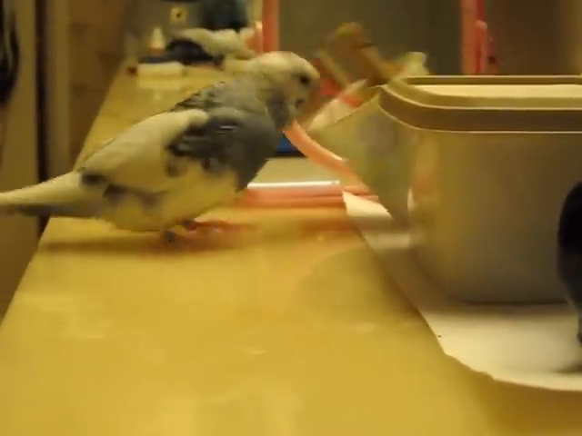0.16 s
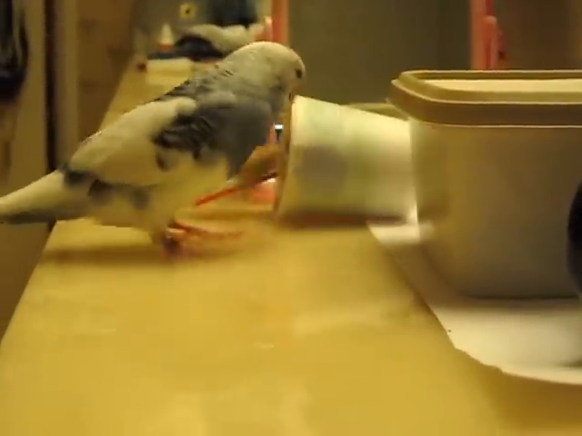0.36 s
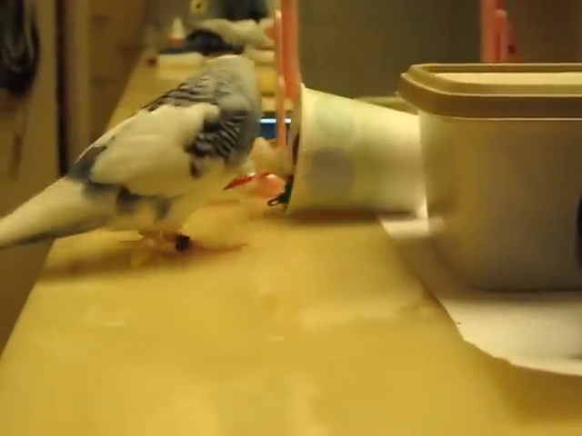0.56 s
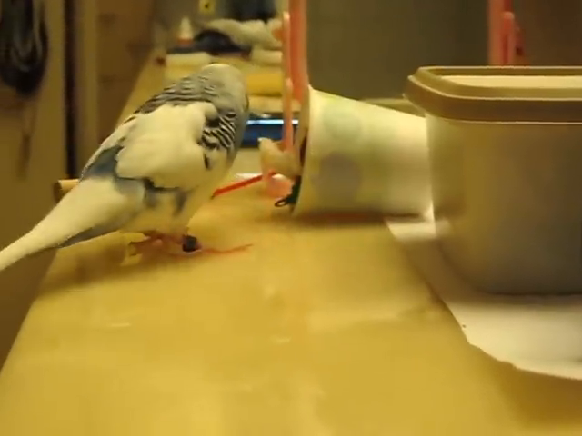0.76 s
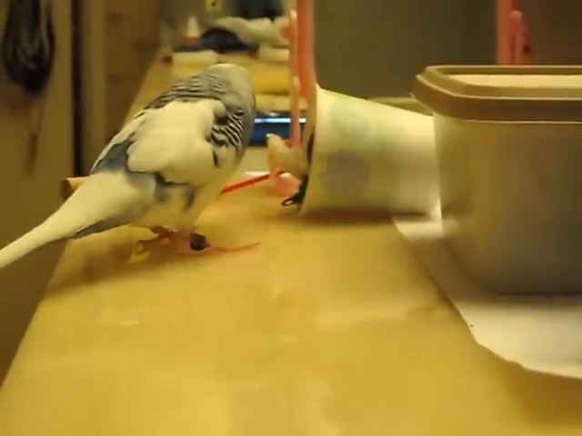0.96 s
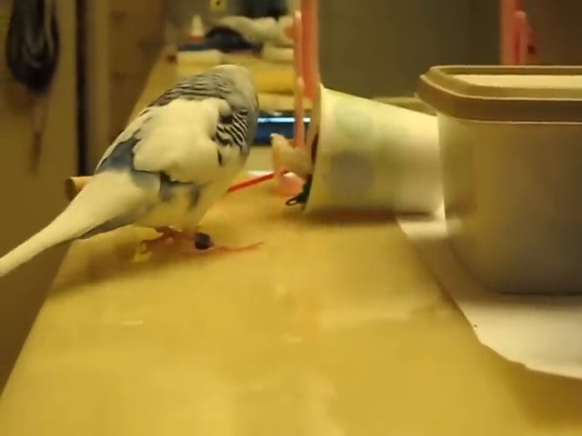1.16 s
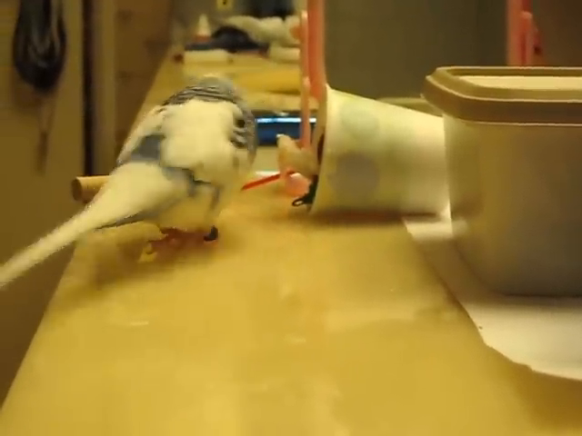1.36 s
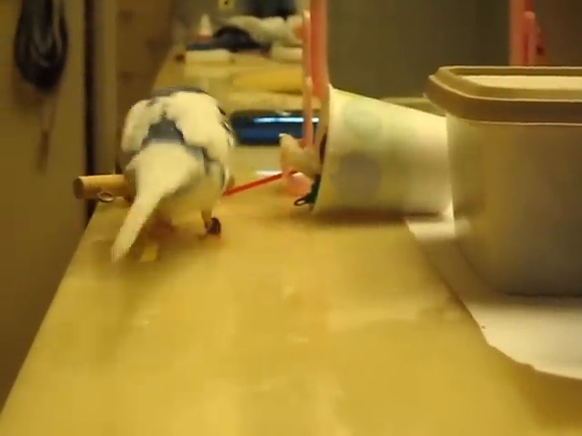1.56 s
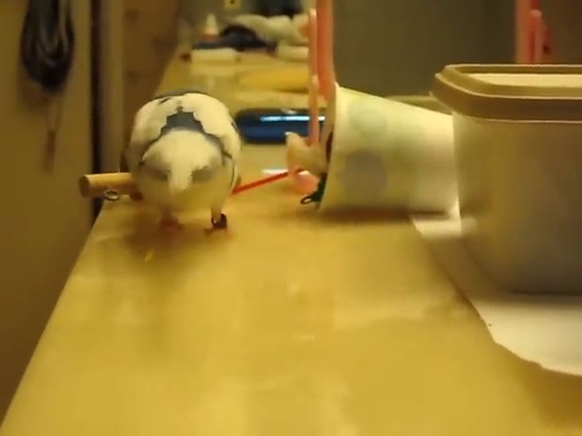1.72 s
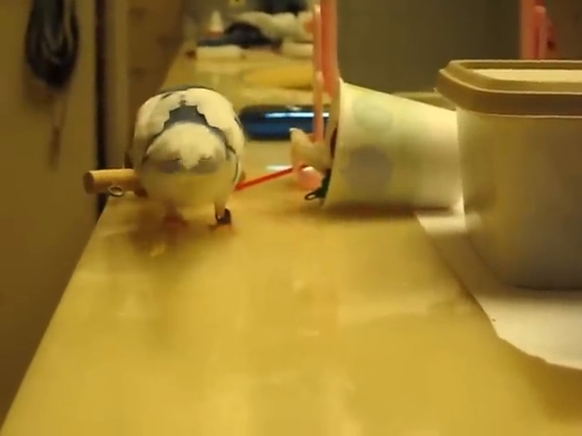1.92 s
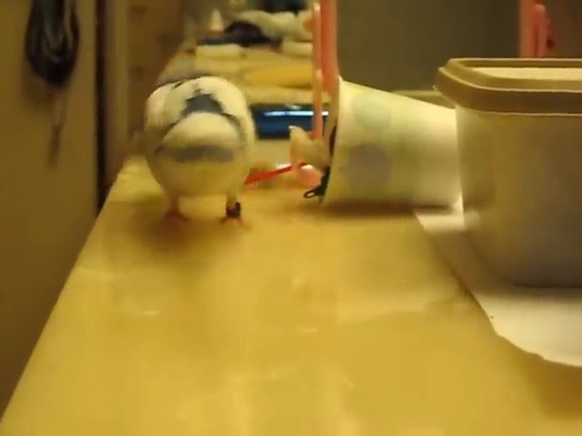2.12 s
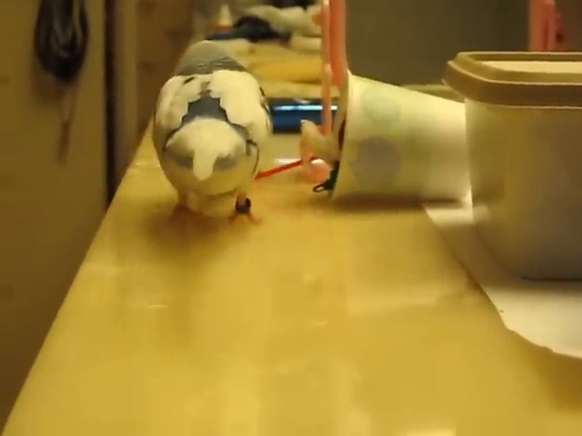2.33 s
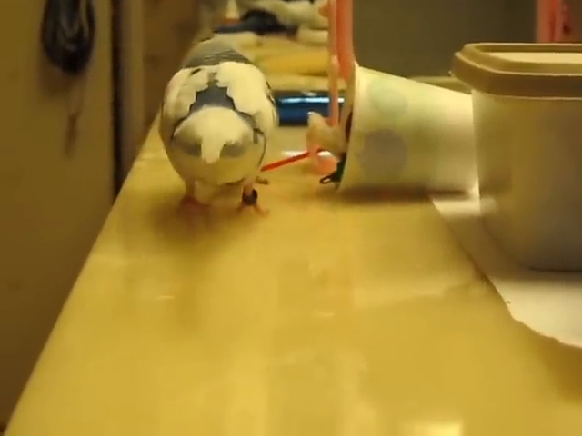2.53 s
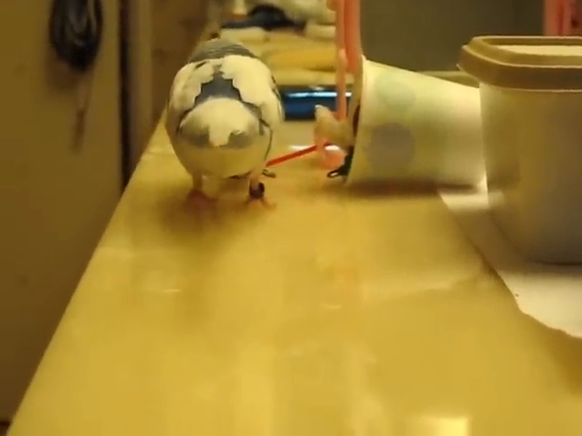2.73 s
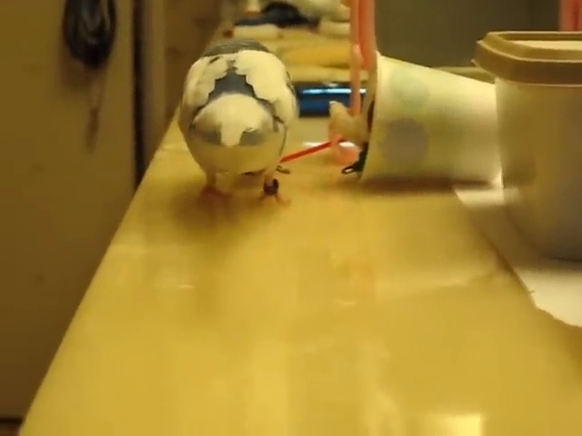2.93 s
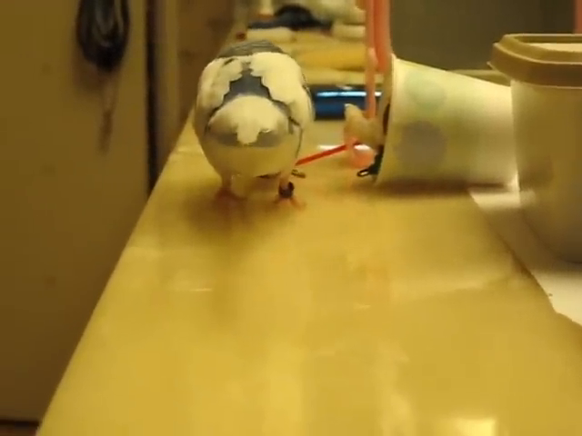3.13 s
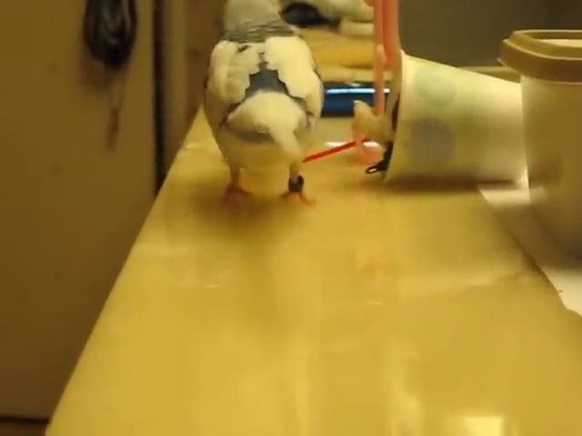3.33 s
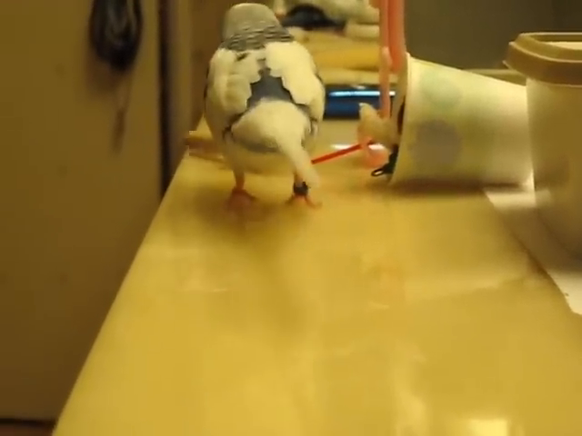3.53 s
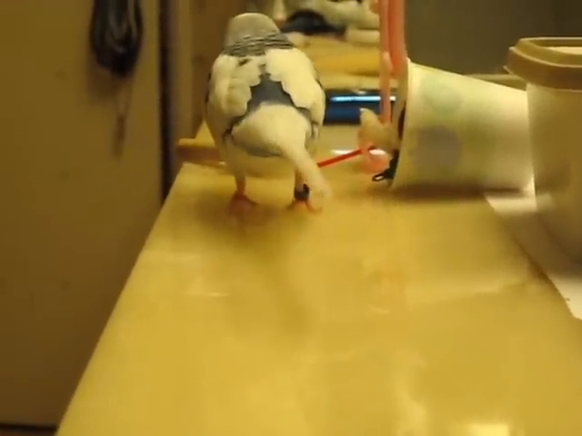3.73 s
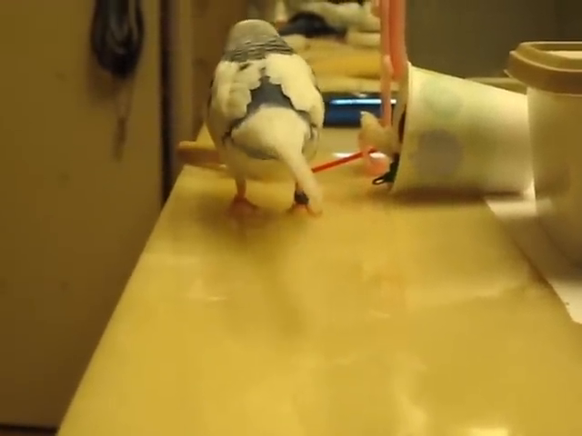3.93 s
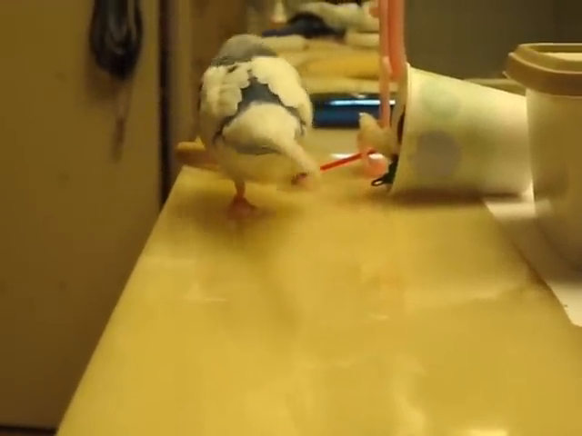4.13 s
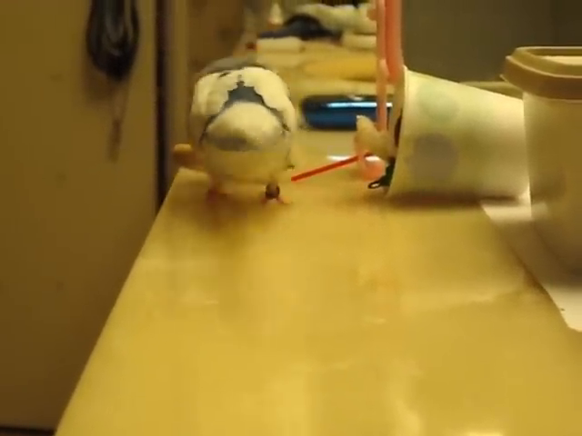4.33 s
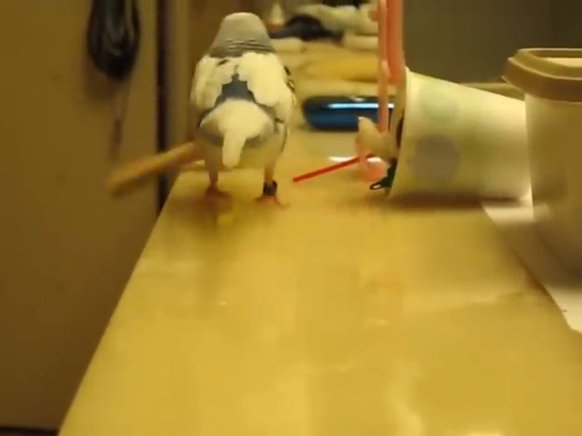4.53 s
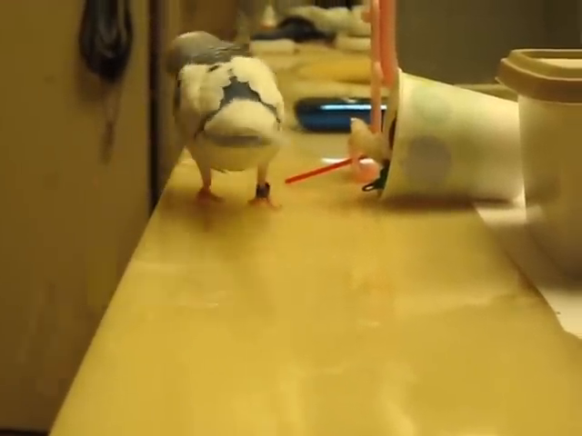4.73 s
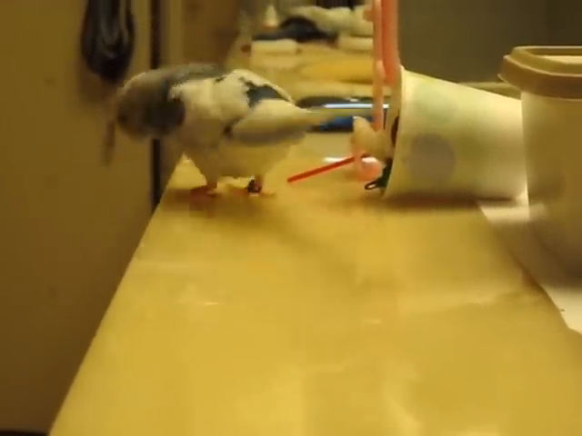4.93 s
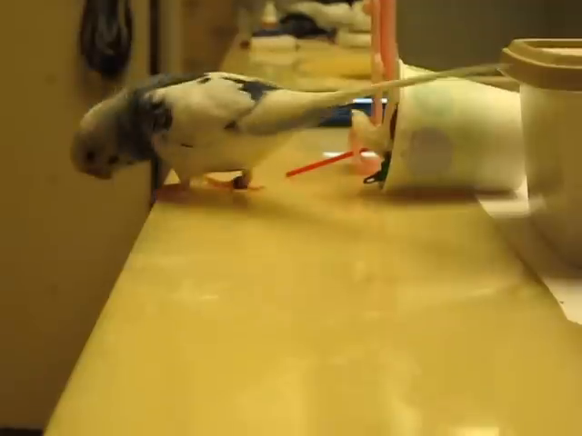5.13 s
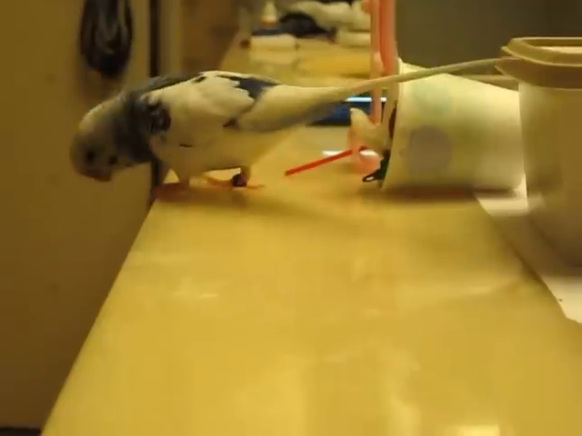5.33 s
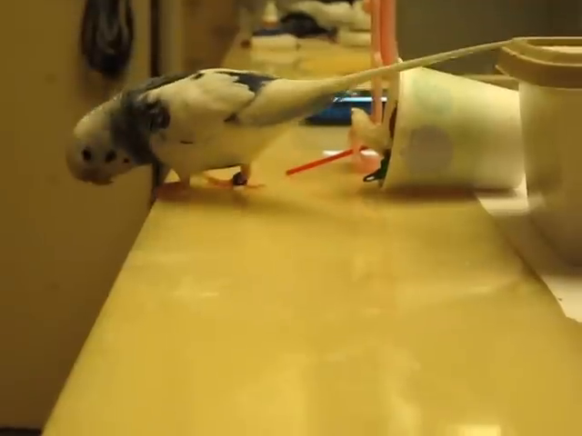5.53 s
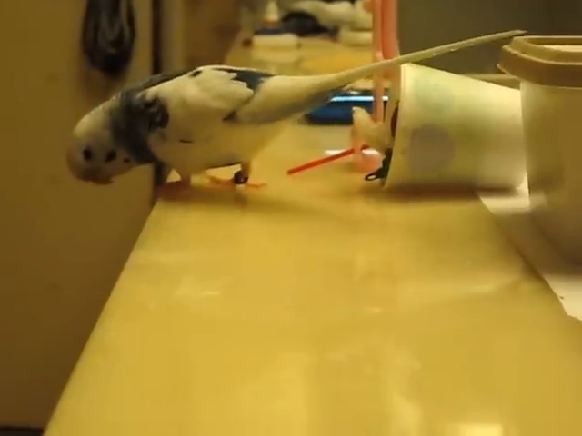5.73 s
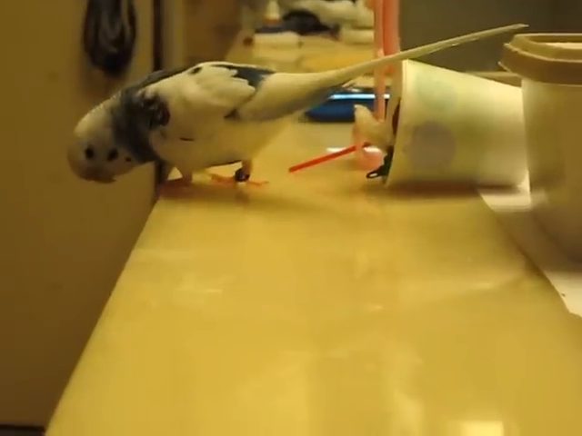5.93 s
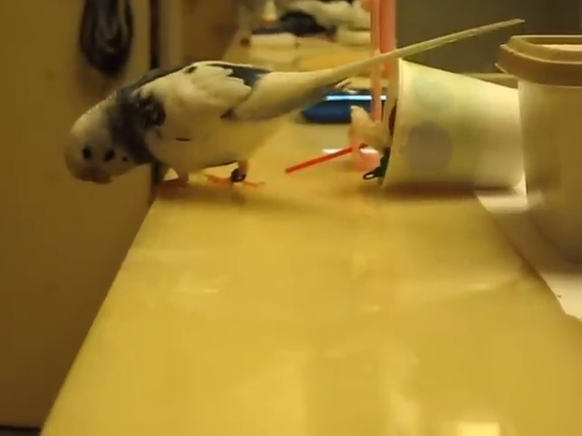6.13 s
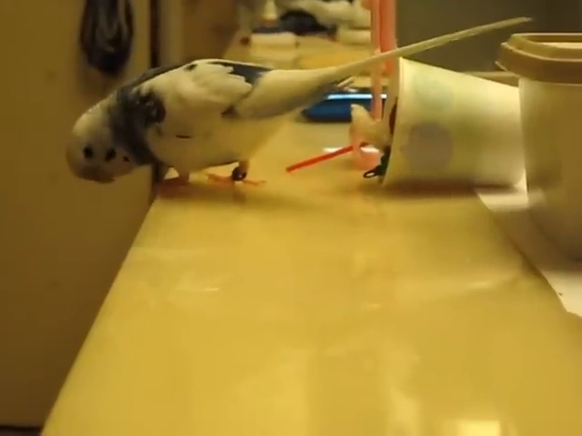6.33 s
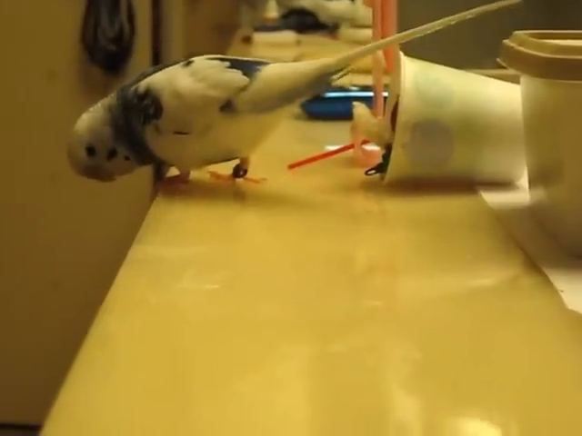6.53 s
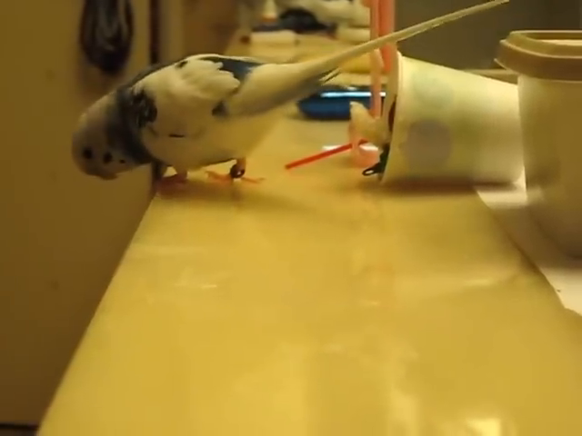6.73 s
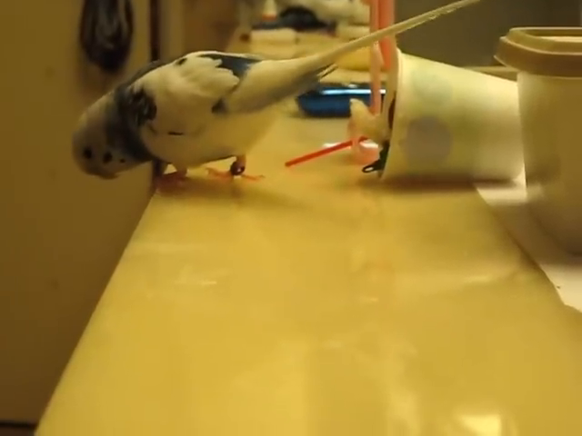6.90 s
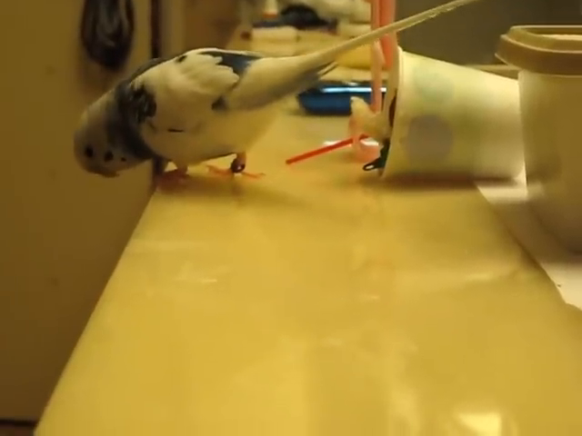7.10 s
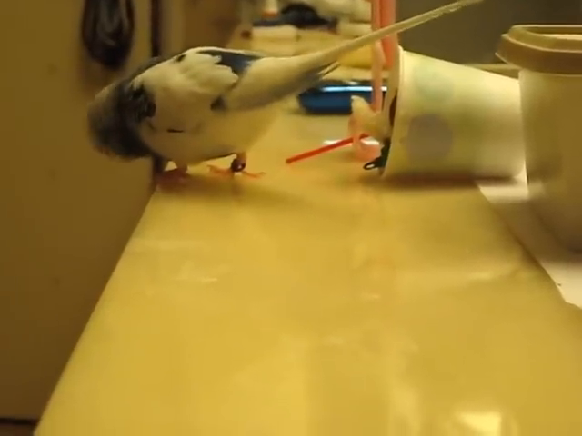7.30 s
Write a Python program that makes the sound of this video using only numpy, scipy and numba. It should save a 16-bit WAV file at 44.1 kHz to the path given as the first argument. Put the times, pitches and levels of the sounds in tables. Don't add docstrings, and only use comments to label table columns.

```python
import sys
import numpy as np
from scipy import signal
from scipy.fft import rfft, irfft
from scipy.io import wavfile
from scipy.ndimage import uniform_filter1d
from numba import njit

SR = 44100
rng = np.random.default_rng(int(sys.argv[2]) if len(sys.argv) > 2 else 0)


def to_wav(s):
    ch = np.atleast_2d(s).T
    pcm = np.round(np.clip(ch, -1, 1) * 32767)
    wavfile.write(sys.argv[1], SR, pcm.astype(np.int16))


def to_linear_factor(level_db):
    exponent = np.asarray(level_db, float) / 20
    return 10 ** exponent


N = 328986
T = np.arange(N) / SR


def unit(x):
    return x / np.sqrt(np.mean(x ** 2))


def peak1(x):
    return x / abs(x).max()


def band(x, lo_hz, hi_hz, order=2):
    edges_hz = [lo_hz, min(hi_hz, 0.45 * SR)]
    return signal.sosfilt(signal.butter(order, edges_hz, "bandpass", fs=SR, output="sos"), x)


def coloured(x, points):
    hz, db = np.transpose(points)
    f = np.fft.rfftfreq(len(x), 1 / SR) + 1
    gain = to_linear_factor(np.interp(np.log(f), np.log(hz), db))
    return unit(irfft(rfft(x) * gain, len(x)))


def walk(rate):
    k = int(SR / rate)
    held = np.repeat(rng.standard_normal(N // k + 1), k)[:N]
    return unit(uniform_filter1d(held, k))


def curve(table, column):
    rows = np.array(table)
    return np.interp(T, rows[:, 0], rows[:, column], left=-150, right=-150)


def add(out, s, sound):
    i = int(s * SR)
    out[i:i + len(sound)] += sound[:N - i]


def ring(hz, db, t60_s, length_s, rise_s):
    t = np.arange(int(length_s * SR)) / SR
    hz, db, t60_s = (np.asarray(v)[:, None] for v in (hz, db, t60_s))
    decay = to_linear_factor(db) * 1000 ** (-t / t60_s)
    return decay * np.sin(2 * np.pi * hz * t) * (1 - np.exp(-t / rise_s)) ** 2


def resonate(x, peaks):
    return unit(sum(to_linear_factor(db) * band(x, hz - width, hz + width, order=1) for hz, width, db in peaks))


@njit
def hollow(x, hz, k):
    y, b, l = np.empty(len(x)), 0., 0.
    for i in range(len(x)):
        g = np.tan(np.pi * hz[i] / SR)
        v = (b + g * (x[i] - l)) / (1 + g * (g + k))
        b, l, y[i] = 2 * v - b, l + 2 * g * v, k * v
    return y


def grains(rate, scatter_db):
    happens = rng.random(N) < rate / SR
    strength_db = scatter_db * np.minimum(rng.exponential(size=N), 3.5)
    return unit(happens * rng.standard_normal(N) * to_linear_factor(strength_db))


def body(x):
    # (pitch_hz, width_hz, level_db)
    hollows = [(490, 70, 19.5), (830, 16, 16), (1230, 90, 8.5), (1354, 15, 0.5), (1750, 22, 8.5),
               (2150, 71, -2), (2620, 8.4, 12.5), (2905, 46, 9.5)]
    return sum(to_linear_factor(db) * band(x, hz - 1.3 * width, hz + 1.55 * width, order=1) for hz, width, db in hollows)


def background():
    # (pitch_hz, level_db per Hz)
    air = [(12, -50), (20, -11.5), (60, -9.5), (210, -8), (241, -6.5), (270, -9.5), (357, -8), (388, -9),
           (1530, -13), (5230, -19), (7950, -20), (9950, -23.5), (16000, -29)]
    # (pitch_hz, level_db rms)
    hum_lines = [(120, -81.5), (241, -67.5), (361, -71.5), (600, -91), (722, -80.5)]
    hum = np.zeros(N)
    for hz, db in hum_lines:
        level = to_linear_factor(db + 0.52 * walk(15)) * np.sqrt(2)
        hum += level * np.sin(2 * np.pi * np.cumsum(hz + 2.405 * walk(11)) / SR)
    hiss_db = -57 - 0.67 + 0.88 * walk(3.08)
    return coloured(rng.standard_normal(N), air) * to_linear_factor(hiss_db) + hum


def rattle():
    # (start_s, level_db, fade_db per s, hollow_hz, scratchy top_db against the level)
    bursts = [(0.013, -44, 400, 1600, -11), (0.08, -55.5, 47, 1190, -17.5), (0.406, -38, 68, 1490, -6.5),
              (0.465, -34, 108, 1260, -20), (0.592, -42.5, 123, 1890, -33), (0.681, -38.5, 146, 2150, -30),
              (0.746, -48, 117, 2100, -20), (0.85, -49.5, 80, 1400, -22), (2.216, -50, 54, 1280, -18),
              (2.246, -41.5, 102, 800, -21), (2.285, -40, 122, 800, -19), (3.433, -32, 127, 1400, -26),
              (3.535, -35.5, 70, 1540, -30), (3.62, -60, 56, 1520, -26), (3.667, -36, 117, 1800, -18.5),
              (3.76, -60, 300, 2050, -28), (4.4245, -51, 200, 1500, -30), (4.572, -26, 127, 1640, -42),
              (4.625, -39.5, 112, 1300, -30), (4.72, -69, 63, 1440, -32), (4.785, -58, 24, 1460, -31),
              (5.18, -48.5, 20, 1600, -30), (5.31, -54, 202, 2000, -3), (6.591, -50.5, 250, 2300, -35),
              (6.979, -80, 205, 2300, 11)]
    # (pitch_hz, width_hz, level_db)
    cup_wall = [(1120, 260, 18), (1920, 110, -10), (2150, 62, -10), (2440, 15, -8), (2570, 18, -13),
                (2850, 74, -1)]
    # (pitch_hz, width_hz, level_db)
    peg_wood = [(814, 35, 1.5), (1210, 28, 5.5), (1373, 11, 0.5), (1750, 45, 5.5), (1520, 20, 0),
                (2135, 36, 4.5), (2600, 22, 5.5), (870, 36, 1.5), (2940, 20, -4)]
    rise_s, lasts_s, upper_middle_db = 0.0026, 0.37, 10

    hits = grains(7000, 1.2)
    rows = np.array(bursts)
    hollow_hz = np.clip(np.interp(T, rows[:, 0], rows[:, 3]), 300, 5000)
    rolling = unit(hollow(hits, hollow_hz, 1.0))
    wall = np.where(T < 1.5, resonate(hits, cup_wall), resonate(hits, peg_wood))
    low = unit(unit(body(hits)) + 3.4 * rolling + 2.2 * unit(band(hits, 600, 3350, order=3)) + 3.5 * wall)

    fine = grains(7000, 2.0)
    mid = unit(band(fine, 3500, 6900, order=3))
    top = unit(band(fine, 8300, 14400, order=3))

    power, scratch = np.zeros(N), np.zeros(N)
    t = np.arange(int(lasts_s * SR)) / SR
    ramp = np.clip(np.minimum(t / rise_s, (lasts_s - t) / 0.24), 0, 1)
    for s, db, fade, _, top_db in bursts:
        shape = (to_linear_factor(db - abs(fade) * t) * ramp) ** 2
        add(power, s, shape)
        add(scratch, s, shape * to_linear_factor(2 * top_db))
    return band(low, 217, 4900) * np.sqrt(power) + (top + mid * to_linear_factor(upper_middle_db)) * np.sqrt(scratch)


def ticks():
    # (start_s, peak_db)
    contacts = [(0.014, -36), (0.203, -42), (0.236, -44), (0.4037, -18), (0.4708, -22), (0.495, -13.5),
                (0.5301, -17.5), (0.6814, -49), (0.6992, -40), (0.7322, -36), (0.773, -41), (2.251, -40),
                (2.2757, -44), (2.312, -37), (2.327, -35), (2.3604, -36), (3.435, -45), (3.4738, -24.5),
                (3.6204, -29), (4.5708, -32), (5.5994, -48), (6.3702, -43), (6.9756, -38), (6.9788, -46),
                (6.9836, -42)]
    out, t = np.zeros(N), np.arange(SR // 50) / SR
    fade = np.exp(-t / 0.00041) + 0.12 * np.exp(-t / 0.0041)
    clicks = band(rng.standard_normal((len(contacts), len(t))) * fade, 3600, 16300, order=3)
    for (s, peak_db), click in zip(contacts, clicks):
        add(out, s, to_linear_factor(peak_db + 5.5) * peak1(click))
    return out


def knocks():
    # (start_s, peak_db, centre_hz, bright edge_db against the peak)
    cup_knocks = [(0.015, -30.5, 1770, -1), (0.023, -40, 1090, -14), (0.078, -34.5, 943, -12),
                  (0.086, -34.5, 1240, -6), (0.174, -42, 1160, -10), (0.204, -37, 1750, -3),
                  (0.392, -33, 1760, -6), (0.4032, -15.5, 1690, 1), (0.4028, -21, 4800, 7),
                  (0.418, -21.5, 1020, -5), (0.466, -20, 2150, -11), (0.478, -23.5, 2210, -8),
                  (0.492, -26, 2450, 1), (0.563, -37, 900, -20), (0.682, -23, 2370, -24),
                  (0.825, -30.5, 1510, -4), (0.851, -24.5, 2100, -19), (0.889, -37.5, 920, -23),
                  (0.991, -40, 1920, -21), (1.017, -43, 2290, -21), (1.047, -46, 2150, -20),
                  (1.087, -46, 917, -24)]
    peg_knocks = [(2.073, -46, 820, -6), (2.093, -45.5, 2450, -2), (2.251, -29, 850, -7),
                  (2.264, -31.5, 810, -20), (2.286, -28.5, 894, -12), (2.323, -29.5, 877, -13),
                  (3.227, -49, 2290, -15), (3.347, -50, 2270, -15), (3.435, -21.5, 1720, 2),
                  (3.448, -25, 1120, 1), (3.475, -41, 810, -8), (3.539, -32, 900, -10),
                  (3.572, -30, 1100, -9), (3.671, -26.5, 1230, -4), (3.543, -28, 930, -12),
                  (3.594, -27.5, 1700, -20), (3.619, -32.5, 890, -12), (3.894, -39.5, 1086, -31),
                  (3.991, -52, 1230, -3), (4.393, -43.5, 2100, -3), (6.351, -47, 1100, -15),
                  (6.5, -48, 1090, -17), (6.51, -46, 830, -20), (6.583, -35.5, 2400, -24),
                  (6.589, -39.5, 2300, -20)]
    bounces = [(4.5706, -17.5, 1450, -13), (4.5852, -18, 2150, -9), (4.599, -22, 1750, -20),
               (4.624, -19, 1400, -12), (4.652, -26, 1900, -24), (4.6845, -23.5, 1200, -18),
               (4.719, -39, 1600, -22), (4.757, -29.5, 2440, -17), (4.784, -41, 3600, -18),
               (4.788, -30, 2600, -23), (4.81, -27, 1560, -23), (4.916, -28, 2530, -4),
               (5.064, -26, 1560, -10), (5.128, -21, 2400, -12), (5.181, -19.5, 1410, -10),
               (5.195, -23.5, 2150, -3), (5.234, -21, 2450, -15), (5.269, -30, 1910, -18),
               (5.294, -32, 2150, -8), (5.368, -27, 2440, -16), (5.453, -34.5, 1810, -30)]
    hits = cup_knocks + peg_knocks + bounces
    out, jolt = np.zeros(N), np.zeros(N)
    t = np.arange(SR // 50) / SR
    spread = rng.standard_normal((len(hits), 2, 6))
    cracks = rng.standard_normal((len(hits), len(t))) * np.exp(-t / 0.0013)
    edges = band(cracks, 3230, 6800, order=3)
    for (s, peak_db, hz, bright_db), c, crack, edge in zip(hits, spread, cracks, edges):
        step = np.clip(c[0], -0.7, 1.1) * (np.arange(6) > 0)
        t60_s = 0.032 * (1500 / hz) * to_linear_factor(-abs(c[1]))
        rings = ring(hz * to_linear_factor(2.0 * step), -6.5 * abs(step), t60_s, 0.07, 0.00018).sum(axis=0)
        centre = band(crack, 0.77 * hz, 1.53 * hz, order=3)
        add(out, s + 0.00062, to_linear_factor(peak_db - 1.0) * peak1(rings))
        add(out, s + 0.0006, to_linear_factor(peak_db - 10.0) * peak1(centre))
        add(out, s + 0.0006, to_linear_factor(peak_db + bright_db + 3.0) * peak1(edge))
        add(jolt, s, to_linear_factor(peak_db + 3.5) * band(crack, 0.72 * hz, 1.9 * hz))
    light = band(out, 680, 17000, order=3)
    return light + band(body(jolt), 726, 3500)


def snaps():
    # (crest_s, peak_db, pitch_hz, half_length_ms)
    cracklets = [(0.083, -40, 1157, 4.5), (0.4039, -12.5, 3970, 0.62), (0.5935, -20.5, 1760, 0.75),
                 (0.5936, -22, 3300, 0.52), (0.604, -26.5, 2110, 0.83), (0.6828, -16, 2360, 0.33),
                 (0.7459, -17, 2570, 0.38), (0.7553, -33, 2070, 1.1), (0.8262, -30.5, 2250, 0.81),
                 (0.8513, -23, 2170, 1), (0.8835, -38, 2300, 0.7), (0.891, -35, 2000, 0.8),
                 (0.899, -39, 2200, 0.8), (1.0645, -41, 2170, 1.1), (1.086, -48, 2600, 1),
                 (2.2516, -26.5, 2290, 1.15), (2.25, -31, 3580, 0.8), (5.139, -28, 2300, 1.5),
                 (5.196, -22.5, 3600, 1.5), (2.287, -31, 2950, 0.94), (3.7614, -14.5, 2450, 0.29),
                 (3.7653, -18.5, 2500, 0.35), (3.769, -34, 2300, 0.58), (3.771, -31, 1690, 0.76),
                 (3.8546, -32.5, 2590, 0.41), (3.883, -44, 2480, 0.7), (4.5706, -15, 3730, 0.94),
                 (4.591, -33, 7040, 0.74), (5.1818, -16, 2630, 0.77), (6.371, -46, 5430, 0.6),
                 (6.9762, -46, 4900, 0.5), (6.982, -53, 4730, 2), (0.8265, -34, 3200, 1.2),
                 (4.497, -50, 2300, 1.5), (6.9852, -39, 14500, 0.8)]
    out, t = np.zeros(N), np.arange(-SR // 50, SR // 50) / SR
    for s, peak_db, hz, half_ms in cracklets:
        swell = np.exp(-(1000 * t / (half_ms * np.where(t > 0, 1.3, 0.8))) ** 2)
        add(out, s - 1 / 50, to_linear_factor(peak_db) * swell * np.cos(2 * np.pi * hz * t))
    return out


def trinket():
    # (start_s, peak_db, top ring_db against the peak)
    trinket_hits = [
        (0.126, -47, -24.5),
        (0.203, -39, -22),
        (0.2364, -44, -13),
        (0.2513, -55, -11),
        (0.421, -28, -25),
        (0.432, -23, -6),
    ]
    # (pitch_hz, t60_s)
    trinket_rings = [(4295, 0.053), (12710, 0.13)]
    out, (hz, t60_s) = np.zeros(N), np.transpose(trinket_rings)
    for s, peak_db, top_db in trinket_hits:
        rings_db = peak_db + np.array([0, top_db])
        add(out, s, ring(hz, rings_db, t60_s, 0.25, 0.00034).sum(axis=0))
    return out * to_linear_factor(2.6 * walk(150.8))


def thumps():
    # (start_s, peak_db)
    blows = [
        (0.401, -35.5),
        (0.467, -40),
        (0.496, -45),
        (2.29, -42),
        (3.44, -40),
        (3.541, -43),
        (4.571, -40),
        (4.627, -45),
        (5.196, -50),
    ]
    out, t = np.zeros(N), np.arange(SR // 8) / SR
    noise = rng.standard_normal((len(blows), len(t))) * np.exp(-t / 0.013)
    shudders = band(noise, 45, 740, order=1)
    for (s, peak_db), shudder in zip(blows, shudders):
        add(out, s, to_linear_factor(peak_db) * peak1(shudder))
    return out


def bell():
    # (pitch_hz, level_db, t60_s)
    shell_rings = [(3465, -4, 0.047), (3860, -20, 0.051), (5040, -13, 0.064), (4970, -1.5, 0.11),
                   (6110, -15.5, 0.1), (6230, -3.5, 0.079), (6280, -3.5, 0.085), (6690, -10.5, 0.1),
                   (6730, -23.5, 0.16), (8640, -9.5, 0.086), (10800, -9, 0.074), (13000, 3, 0.074),
                   (12860, -4, 0.05), (15450, -11, 0.05), (13570, -3, 0.05), (14060, 3, 0.07),
                   (14120, 1, 0.05), (13600, -5, 0.04)]
    # (start_s, peak_db near 6 kHz, lowest_db, middle_db, top_db rings against it)
    spilled = [(0.4672, -19, -10, -14, -17), (0.4708, -20.5, -12, -13, -13), (0.4941, -24, -8, -16, -12),
               (0.5295, -30.5, -2, -14, -12), (0.5444, -32, -5, -11, -15), (0.599, -45, -4, -14, -14),
               (0.7005, -27, -5.5, -18, -17), (0.7321, -36.5, -11, -10, -14), (0.772, -27, -15, -14, -18),
               (0.8032, -27, -16, -17, -14), (0.8184, -29.5, -16, -13, -11), (0.9301, -32.5, -17, -16, -17),
               (0.9351, -33.5, -23, -18, -25)]
    shaken = [(2.1021, -43.5, -11, -5, -22), (2.2155, -35.5, -15, -11, -8.5), (2.2228, -32, -19, -14, -21),
              (2.2665, -34, -23, -17, -13), (2.2716, -32, -26, -18, -15), (2.3112, -21.5, -10, -15, -5.5),
              (2.3271, -21, -13, -17, -6), (2.3585, -23, -10.5, -13, -10), (2.3738, -26.5, -6.5, -9, -5),
              (2.3897, -29.5, -25, -16, -6), (2.4014, -31.5, -24, -10, -5), (2.478, -45, -11, -10, -18),
              (3.4346, -23.5, -1.5, -14, -21), (3.4725, -24, -5, -9.5, 3), (3.4914, -30.5, -9, -2, 0),
              (3.532, -23, -16, -20, -5), (3.5402, -22, -14, -14, -11), (3.5448, -23.5, -13, -14, -3),
              (3.5614, -39, -3, 0, -1), (3.5723, -31.5, -12, -9, -7), (3.6202, -17.5, -16, -24, -9.5),
              (3.6496, -24, -12.5, -25, -5), (3.6658, -33.5, -6, -7, -1), (3.714, -17.5, -19.5, -26, -13.5),
              (3.7266, -25, -17, -25, -16), (3.7406, -26.5, -18, -16, -6.5), (3.782, -34.5, -17, -14, -20),
              (3.787, -35, -24, -22, -27), (3.8137, -43, -21, -12, -25), (4.5701, -29.5, 6.5, -6, -4),
              (4.579, -40, -3, 4, -18), (4.5944, -38, 1, 8, -11), (4.6245, -36, -9, -10, -21),
              (4.6388, -42, -14, -8, -20), (4.8858, -32.5, -4.5, -1, -9)]
    lifted = [
        (4.4242, -32, -23, -30, -9.5),
        (4.4399, -29.5, -30, -24, -17),
        (4.5187, -45.5, -22, -24, -25),
    ]
    out, (hz, db, t60_s) = np.zeros(N), np.transpose(shell_rings)
    hits = sorted(map(tuple, spilled + shaken + lifted))
    group = np.searchsorted([4200, 5500, 7500], hz)  # lowest, middle, 6 kHz, top
    chance = rng.standard_normal((len(hits), 3, len(hz)))
    t = np.arange(SR // 12) / SR
    shape = (len(hits), len(t))
    chatter = (rng.random(shape) < 350 / SR) * rng.standard_normal(shape)
    free_s = np.diff([row[0] for row in hits], append=N / SR)
    leaves = 0.53
    for (s, peak_db, low_db, middle_db, top_db), c, taps, free in zip(hits, chance, chatter, free_s):
        group_db = np.array([low_db + 6.5, middle_db + 3, -3.0, top_db - 10.0])
        ring_db = peak_db + db + group_db[group] + 1.2 * c[0]
        rings = ring(hz * (1 + 0.003 * c[1]), ring_db, t60_s * to_linear_factor(0.38 * c[2]), 0.2, 0.00018).sum(axis=0)
        push = 0.16 * taps * np.exp(-t / 0.028)
        push[0] = 1
        sound = signal.fftconvolve(rings, push)
        late = np.clip(np.arange(len(sound)) / SR - free, 0, 1)
        add(out, s, sound * (leaves + (1 - leaves) * np.exp(-late / 0.0008)))
    return out * to_linear_factor(1.5 * walk(220))


def buzz(shell):
    return band(shell, 12000, 16000) * 0.6 * walk(1500)


def pings():
    # (start_s, peak_db, pitch_hz)
    hollow_pings = [(0.854, -37, 1430), (0.882, -43, 880), (0.9, -45, 910), (0.92, -49, 890),
                    (0.992, -42, 2300), (0.993, -42, 1580), (1.019, -44, 2180), (1.087, -43.5, 944),
                    (4.72, -26, 1600), (4.759, -31.5, 1480), (4.783, -30, 1384), (4.811, -34, 1600),
                    (6.59, -42.5, 2330), (4.572, -32, 807), (4.6255, -30, 797), (4.662, -33, 1150),
                    (5.183, -26.5, 1350)]
    # (start_s, peak_db, pitch_hz)
    shell_pings = [(0.497, -30, 6270), (0.496, -40, 10780), (0.531, -38, 10780), (0.472, -44, 10780),
                   (0.67, -49, 10780), (0.501, -33, 4600), (0.531, -36, 4400), (0.508, -34, 3465),
                   (0.546, -37, 3465), (0.561, -39, 3465), (0.7008, -41, 4400), (3.492, -38, 4970),
                   (3.562, -34.5, 4970), (3.442, -36, 4970), (4.581, -28.5, 4955), (4.598, -31, 4955),
                   (0.931, -46, 4500), (2.39, -45, 4000), (3.545, -35, 3900), (3.669, -33.5, 3900),
                   (4.4245, -45, 4680), (4.44, -45, 4800), (4.519, -46, 4680), (4.519, -54, 3300),
                   (4.635, -38, 6060), (4.646, -45, 4960), (4.668, -52, 6800), (4.686, -51, 6150),
                   (4.688, -53, 4960), (2.5, -53, 4960)]
    out, rise_s = np.zeros(N), 0.00036
    for s, peak_db, hz in hollow_pings:
        pair = ring([hz, 0.94 * hz], [peak_db, peak_db - 8.0], [0.055, 0.055], 0.15, rise_s)
        add(out, s, pair.sum(axis=0))
    for s, peak_db, hz in shell_pings:
        add(out, s, ring([hz], [peak_db], [0.1], 0.15, rise_s)[0])
    return out * to_linear_factor(1.8 * walk(200))


def skid():
    # (start_s, slip_rate_hz, level_db)
    glide = [
        (0.615, 1500, -41),
        (0.6195, 1510, -30),
        (0.6215, 2070, -26),
        (0.6245, 3070, -38),
        (0.628, 2200, -23),
        (0.6298, 1750, -29),
        (0.6315, 2000, -24),
        (0.6335, 2050, -19.5),
        (0.6352, 1900, -50),
    ]
    rows = np.array(glide)
    slip_hz = np.interp(T, rows[:, 0], rows[:, 1])
    return to_linear_factor(curve(glide, 2)) * np.sin(2 * np.pi * np.cumsum(slip_hz) / SR)


def squeak():
    # (start_s, slip_rate_hz, level_db, overtones_db against the level)
    rocks = [
        (0.9, 640, -57, -6),
        (0.918, 688, -48.5, 3),
        (0.933, 692, -52, -6),
        (0.946, 768, -59, 1),
        (0.962, 701, -50.5, -3),
        (0.976, 718, -53, -18),
        (1.005, 845, -52, -25),
        (1.045, 830, -59, -25),
        (1.07, 750, -57, -25),
    ]
    rows = np.array(rocks)
    slip_hz = np.interp(T, rows[:, 0], rows[:, 1]) * (1 + 0.022 * walk(200))
    turns = np.cumsum(slip_hz) / SR
    flutter_db = 4.5 * walk(90)
    overtones = sum(to_linear_factor(db) * np.sin(2 * np.pi * k * turns) for k, db in enumerate([1.0, 1.0, -1.0], start=2))
    tone = np.sin(2 * np.pi * turns) + overtones * to_linear_factor(curve(rocks, 3))
    return tone * to_linear_factor(curve(rocks, 2) + flutter_db)


def slide():
    # (start_s, level_db)
    pressure = [
        (4.806, -68),
        (4.812, -54),
        (4.835, -42.5),
        (4.9, -39),
        (4.915, -34),
        (5.1, -32.5),
        (5.24, -36.5),
        (5.3, -49),
        (5.47, -64.5),
    ]
    # (pitch_hz, level_db per Hz)
    scrape_colour = [(59, -56.5), (100, -27), (415, -14), (621, -14), (801, -7), (1650, -5.5), (5300, 1),
                     (6990, 1), (7770, -0.5), (10000, -2), (16000, -2.5)]
    # (centre_s, change_db, half_length_ms)
    rocking = [
        (4.897, -4.5, 10),
        (4.916, 4, 6.6),
        (4.952, 4, 16),
        (5.02, 2, 15),
        (5.09, 4, 16),
        (5.172, -2, 12),
        (5.202, 5, 14),
        (5.325, 7, 16),
        (5.05, -2, 12),
    ]
    hiss = coloured(grains(24000, 0.6), scrape_colour)
    low = band(hiss, 80, 4700)
    db = curve(pressure, 1) + 1.2 * walk(45)
    for s, change_db, half_ms in rocking:
        db = db + change_db * np.exp(-(1000 * (T - s) / half_ms) ** 2)
    low_db = -4 + 12 * np.clip(T - pressure[0][0], 0, 1)
    return (hiss - low) * to_linear_factor(db + 5.5) + low * to_linear_factor(db + low_db + 8.5)


def room(x):
    t60_s, tail_db = 0.2, -11
    t = np.arange(SR // 2) / SR
    noise = rng.standard_normal(len(t)) * np.clip(t / 0.0091, 0, 1)
    low = band(noise, 240, 1540, order=1)
    tail = low * 1000 ** (-t / t60_s) + (noise - low) * 1000 ** (-t / (0.5 * t60_s))
    tail = tail / np.sqrt(np.sum(tail ** 2))
    return x + to_linear_factor(tail_db) * signal.fftconvolve(x, tail)[:N]


def scene():
    shell = bell()
    metal = shell + buzz(shell) + trinket() + pings()
    contacts = knocks() + ticks() + rattle() + snaps()
    rubbing = squeak() + skid()
    objects = band(metal + contacts + rubbing, 195, 16500)
    return (room(objects + slide()) + thumps() + background())[None]


def low_pass(x):
    return signal.sosfilt(signal.butter(12, 16810, fs=SR, output="sos"), x)


def record(dry):
    gap_hz, gap_width_hz, top_hz = 7887, 2040, 15750
    f = np.fft.rfftfreq(N, 1 / SR)
    gap = 1 - np.exp(-abs(2 * (f - gap_hz) / gap_width_hz))
    slope_db = -22 * np.clip((f - top_hz) / 1000, 0, 2)
    cliff_db = -13.0 * (1 + np.tanh((f - top_hz) / 80))
    heard = irfft(rfft(dry) * gap * to_linear_factor(slope_db + cliff_db), N)
    return low_pass(heard)


dry = scene()
out = record(dry)
to_wav(out)
```